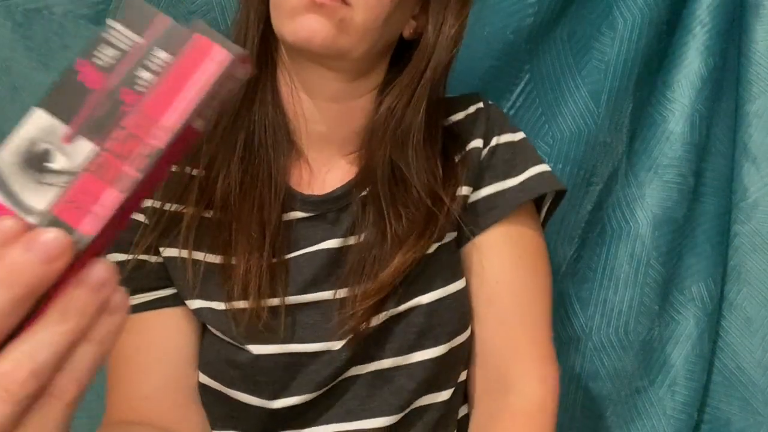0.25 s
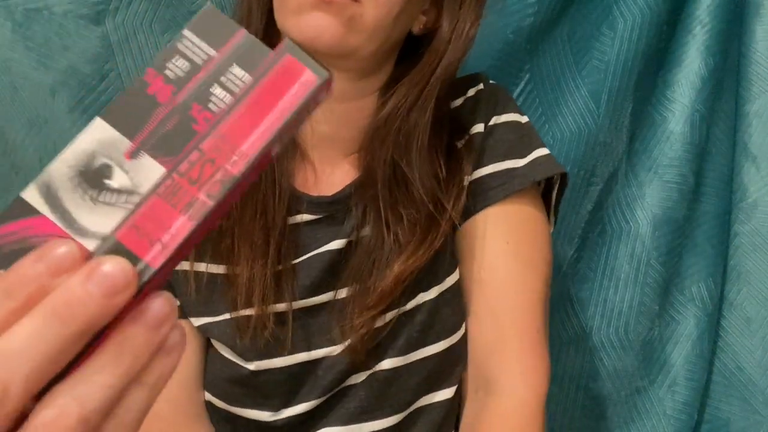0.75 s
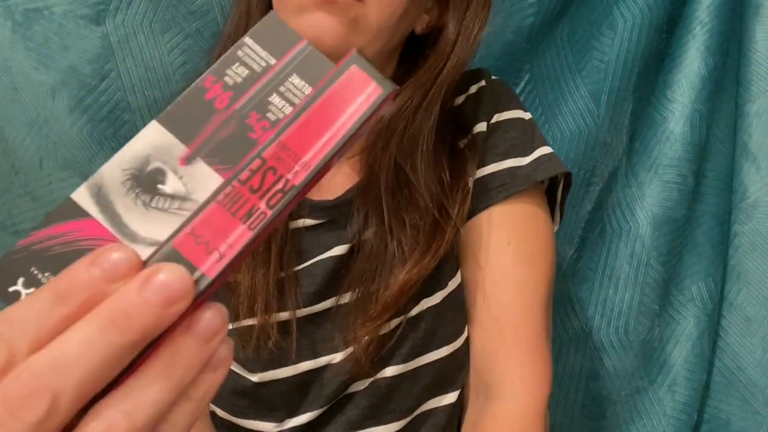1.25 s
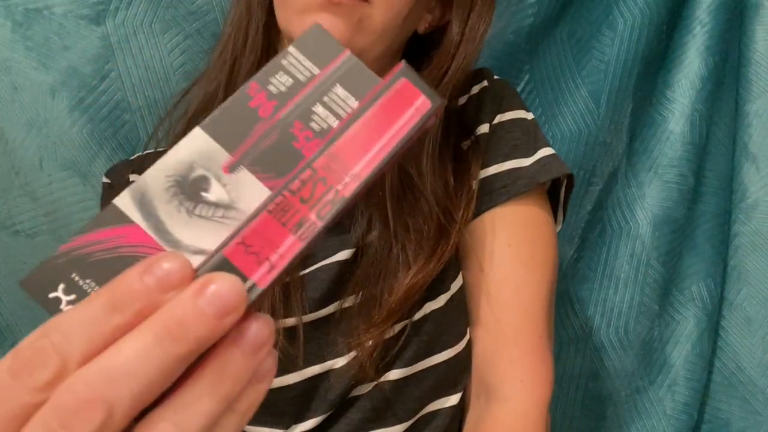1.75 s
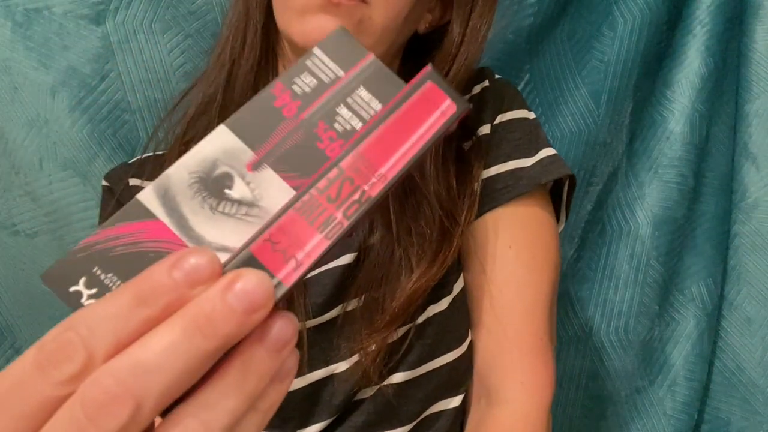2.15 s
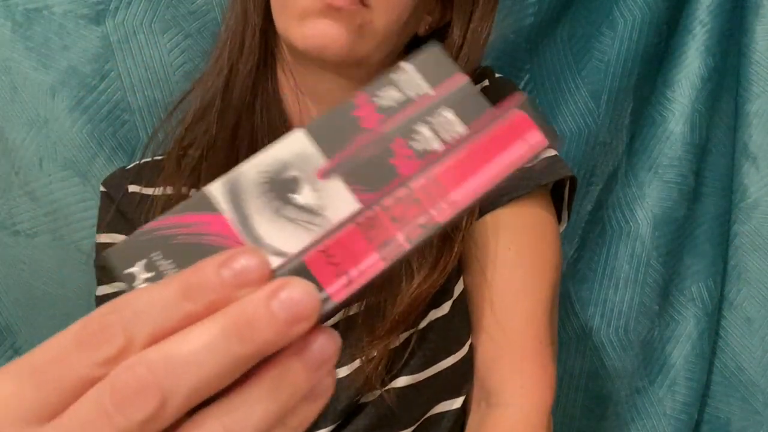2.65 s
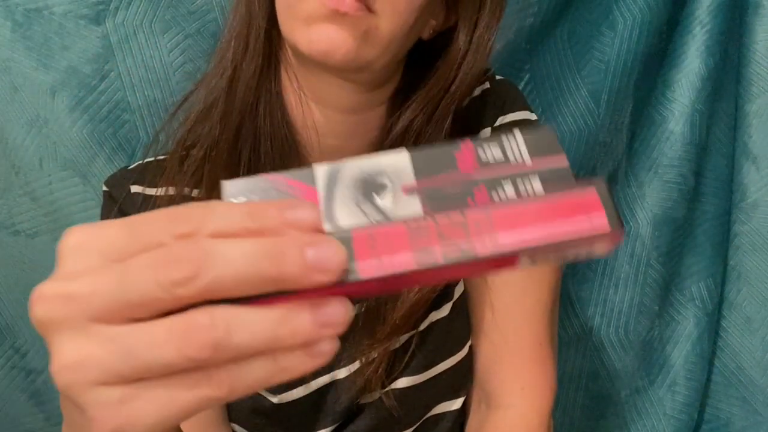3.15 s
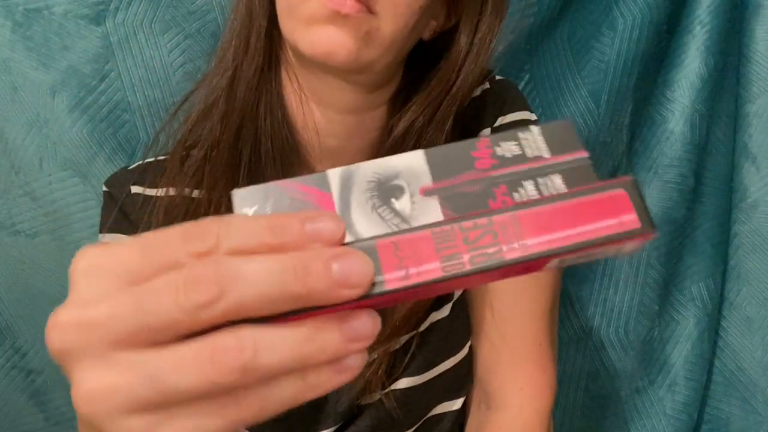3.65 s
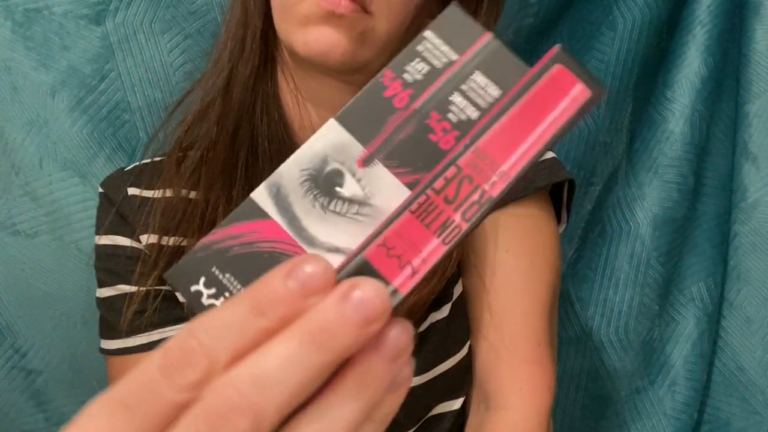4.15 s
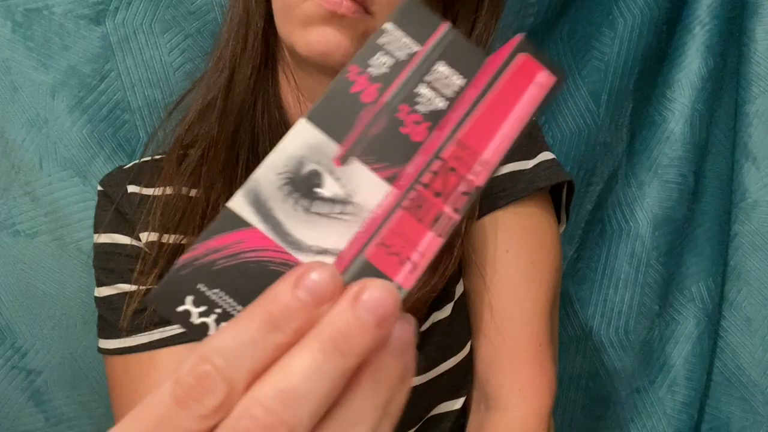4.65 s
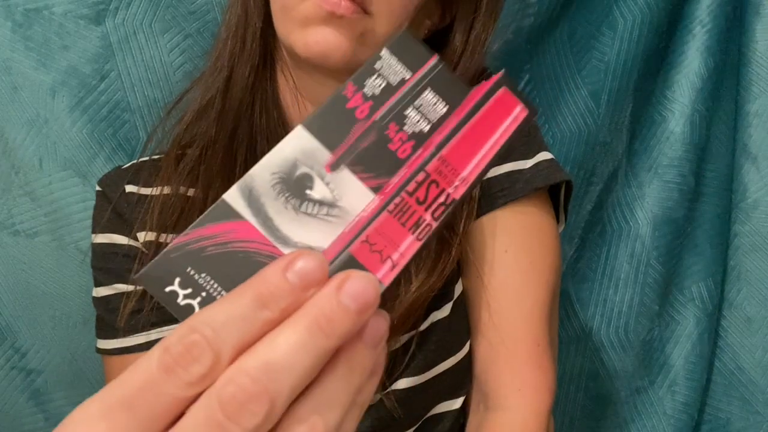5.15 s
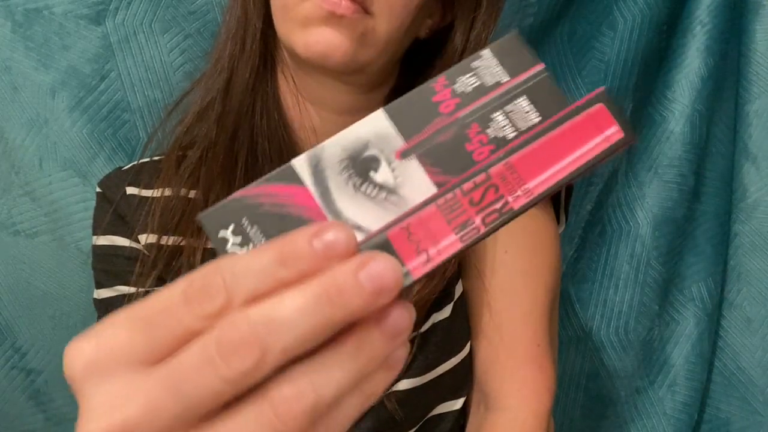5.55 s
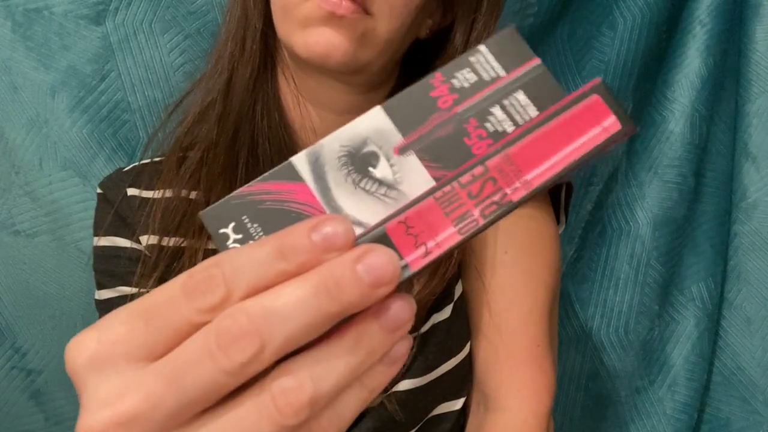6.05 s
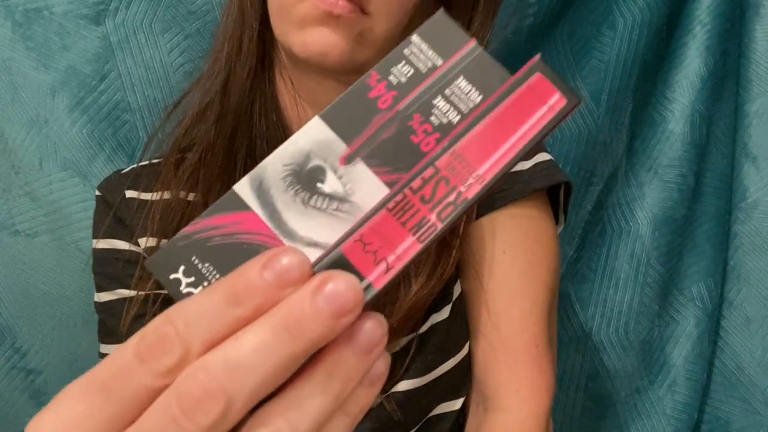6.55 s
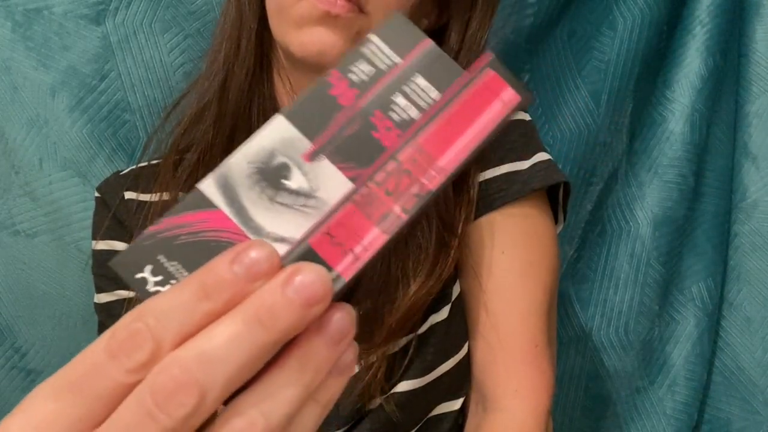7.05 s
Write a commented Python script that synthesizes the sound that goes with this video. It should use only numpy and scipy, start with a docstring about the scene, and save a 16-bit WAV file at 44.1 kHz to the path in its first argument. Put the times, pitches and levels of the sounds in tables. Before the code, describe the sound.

Rapid hollow taps and light clicks on a small carton, with faint scuffs between, very close, over soft steady hiss.

```python
"""Knocks on a slim cardboard box

A hand holds the box with a plastic tube close to a small stereo microphone in a quiet, curtained room.
Quick hard knocks, strong and weak mixed, are damped box modes plus a noise crack and a low thud of air.
Brief scuffs and light rubbing are uneven coloured noise; the box drifts to the right overall.
Sparse, fast-dying echoes and a steady hiss lie behind."""
import sys
import numpy as np
from scipy import signal
from scipy.fft import rfft, irfft
from scipy.io import wavfile
from scipy.ndimage import uniform_filter1d

SR = 44100
rng = np.random.default_rng(int(sys.argv[2]) if len(sys.argv) > 2 else 0)


def dump(signal):
    """Clip the signal to [-1, 1] and save it as 16-bit WAV at the path in sys.argv[1]."""
    limited = np.clip(np.atleast_2d(signal).T, -1, 1)
    pcm = np.round(limited * 32767).astype(np.int16)
    wavfile.write(sys.argv[1], SR, pcm)


N = 321489

# Source levels are port-mean peaks (rubbing: right-port RMS), ahead of echoes and microphone colour.
# Hiss of room and microphone, spectrum: f/Hz, relative level/dB
HISS_SPECTRUM = [(25, -15), (45, -2), (75, -7.5), (120, -1), (200, -12), (450, -26), (1500, -22),
                 (4000, -26.5), (8000, -30), (10500, -38), (12500, -33), (14800, -46.5)]
# Hiss, left-right likeness: f/Hz, correlation/1
HISS_LIKENESS = [(60, 0.27), (200, 0.29), (630, 0.27), (3000, -0.36), (8000, -0.0015), (12500, 0.38)]
# Echo decay: f/Hz, t60/s
ROOM_T60 = [(100, 0.62), (400, 0.22), (1500, 0.21), (5000, 0.18), (12000, 0.17)]
# Echo colour: f/Hz, gain/dB
ECHO_COLOUR = [(150, -0.5), (400, -2.5), (1000, -4), (3000, 1.8), (8000, 2)]
# Microphone response: f/Hz, gain/dB
MICROPHONE_RESPONSE = [(30, -17), (70, 5.5), (110, 0.5), (170, -3), (260, -0.16), (8500, 0.1), (9600, 1.5),
                       (10500, -15.5), (11600, -6.5), (13200, -6.5), (15000, -10.5)]
# Left-port shading against right: f/Hz, gain per pan/(dB/dB)
PORT_SHADE = [(100, 1.8), (480, 0.69), (720, 1.82), (1000, 0.9), (1300, .5), (2500, 0.48), (3400, 0.33)]
# Left-port phase against right, low band: f/Hz, phase per pan/(rad/dB)
PORT_PHASE = [(100, 0.013), (430, 0.012), (700, 0.048), (950, 0.088), (1500, 0.16), (2500, 0.24),
              (3400, 0.39)]
# Left-port phase lead, treble: f/Hz, phase/rad
TREBLE_LEAD = [(4000, -.5), (4800, -1.3), (5500, -2.2), (7000, -.8), (8000, .05), (10400, 3.1),
               (12000, 6.0), (13600, 6.6), (14700, 9.3)]
# Box position: t/s, left minus right/dB
BOX_SIDE = [(0.0, 5), (.55, 2.5), (.75, -4), (1.4, -6), (2.3, -8.5), (3.0, -11.5), (4.5, -12), (5.5, -14),
            (6.0, -14), (6.3, -9), (7.29, -12)]
# Rubbing of skin and plastic on card: t/s, level/dB
RUBBING_LEVEL = [(0.0, -64), (0.67, -79.5), (0.91, -68), (1.2, -80.5), (2.17, -68.5), (2.39, -81.5),
                 (3.84, -89), (4.04, -79), (4.97, -82.5), (5.16, -70), (5.64, -74), (6.19, -80),
                 (7.29, -86.5)]
# Rubbed card, spectrum: f/Hz, relative level/dB
GRIT_SPECTRUM = [(200, -2), (600, 0.5), (2000, 1.3), (4000, -9), (8000, -17.5), (15000, -21)]
# Scuffs: t/s, peak level/dB, 1/e fall of the envelope/ms
SCUFF_EVENTS = [(0.019, -50, 3.3), (0.059, -53, 12), (0.14, -63.5, 2.5), (0.233, -48.5, 51),
                (.299, -46, 6.9), (0.367, -48.5, 36), (.618, -67, 53), (0.749, -53, 24), (.766, -48, 6),
                (0.828, -43.5, 9.9), (0.891, -43, 14), (0.94, -49, 23), (1.021, -39.5, 5.5),
                (1.066, -47.5, 16), (1.085, -48.5, 7.), (1.16, -65, 9.5), (1.186, -58.5, 18),
                (1.278, -63.5, 8.), (1.301, -60.5, 13), (1.45, -48.5, 2.7), (1.545, -57.5, 25),
                (1.711, -52, 4.8), (1.956, -51, 6.6), (2.036, -48, 3.4), (2.086, -46, 4),
                (2.163, -50.5, 6.), (2.226, -51, 6.9), (2.346, -54.5, 7.8), (2.481, -49.5, 3.6),
                (2.847, -46, 4.4), (3.539, -60, 5.1), (3.812, -50.5, 10), (3.907, -38, 2.8),
                (4.212, -60, 6.7), (4.297, -63, 6.6), (4.347, -59.5, 8.4), (4.607, -45.5, 5.6),
                (4.672, -56.5, 24), (4.737, -62, 25), (5.224, -61.5, 6.1), (5.397, -46, 14),
                (5.513, -55, 7.6), (5.974, -58, 19)]
# Knocks: t/s, box peak level/dB, lowest mode f/Hz, crispness/dB, thud peak level/dB
KNOCK_EVENTS = [(0.076, -31, 405, -3.5, -56.5), (0.186, -30.5, 408, -2, -74), (0.259, -28.5, 398, 0.5, -65),
                (0.312, -19.5, 448, 0.5, -54), (0.386, -49, 404, 21, -61), (0.45, -54.5, 369, 15.5, -82),
                (0.552, -44, 396, -11, -64), (0.646, -54.5, 387, 5.5, -61), (0.694, -31.5, 376, -7, -65),
                (0.777, -33, 484, -3.5, -59.5), (0.838, -25.5, 432, -4, -68), (0.903, -30, 366, -5, -63),
                (0.962, -21, 446, -6, -50), (1.034, -29.5, 350, -3.5, -56.5), (1.095, -26, 438, -11, -52.5),
                (1.214, -46, 390, -5.5, -53), (1.329, -30.5, 337, -6.5, -73), (1.392, -42.5, 360, 9, -76),
                (1.454, -35, 355, -8.5, -65), (1.517, -51, 533, 3, -67), (1.571, -30.5, 377, -8.5, -72),
                (1.643, -47, 464, 8, -62), (1.7, -46.5, 520, 9, -58.5), (1.776, -54, 316, 44, -89.5),
                (1.831, -33.5, 385, -0.5, -73), (1.897, -42.5, 377, 28, -76),
                (1.963, -30, 444, -1.5, -50.5), (2.028, -44.5, 467, 19, -67), (2.096, -26.5, 440, -3, -51),
                (2.166, -47.5, 372, 19, -78), (2.236, -27, 463, -1.5, -62.5), (2.356, -35.5, 486, -1, -63),
                (2.486, -40, 439, -1.5, -65.5), (2.594, -39, 440, 1.5, -59.5), (2.671, -51.5, 364, 25, -69),
                (2.738, -29, 396, 6, -66), (2.837, -33, 431, 5, -61), (2.932, -45.5, 420, -0.5, -64),
                (3.04, -59.5, 418, 1.5, -69.5), (3.175, -32, 459, 4.5, -61.5), (3.291, -40, 458, 2.5, -69),
                (3.431, -31, 437, 7.5, -90), (3.548, -34.5, 496, -7, -63), (3.655, -66, 404, -4.5, -79),
                (3.824, -25.5, 444, 1.5, -61), (3.914, -28, 330, -4.5, -65.5), (3.941, -30.5, 330, 12, -64),
                (4.092, -29.5, 439, -1, -64.5), (4.17, -46.5, 390, 8, -66), (4.221, -28.5, 392, 0.5, -75),
                (4.356, -46, 377, 0.5, -61), (4.421, -52.5, 533, 14, -68), (4.483, -55, 394, 16, -65),
                (4.553, -56, 530, 21.5, -67.5), (4.599, -34.5, 383, -0.5, -64.5),
                (4.665, -48.5, 401, 18.5, -65.5), (4.811, -48, 530, 28, -68.5), (4.958, -53, 526, 27, -92),
                (5.014, -21, 425, 5, -51.5), (5.077, -41.5, 453, 7.5, -61),
                (5.153, -25.5, 438, -1.5, -57.5), (5.267, -30, 375, -1.5, -50),
                (5.331, -44, 430, 14, -63.5), (5.4, -24.5, 408, 2, -65), (5.447, -42.5, 513, 12.5, -64.5),
                (5.47, -30, 395, -2.5, -64.5), (5.523, -19, 403, 2, -50), (5.58, -47.5, 447, 15.5, -86),
                (5.638, -27.5, 380, 0, -84), (5.695, -45.5, 417, 11.5, -68), (5.751, -28, 424, 0, -87),
                (5.813, -42, 513, 8, -61), (5.867, -25, 437, -2, -66.5), (5.937, -46.5, 350, 3, -53),
                (5.988, -24.5, 441, 0, -55), (6.069, -50.5, 380, -5, -60.5), (6.113, -33, 398, 0, -52),
                (6.21, -44, 330, -7, -58), (6.288, -46.5, 440, 12, -53.5), (6.355, -35.5, 426, -6.5, -53),
                (6.475, -44, 382, -0.5, -63), (6.534, -54, 490, 18, -66), (6.582, -34.5, 418, 0, -66),
                (6.657, -51.5, 390, 17, -66), (6.732, -30.5, 447, 5, -85), (6.819, -50, 400, 11, -71),
                (6.884, -37.5, 443, 3, -74), (7.008, -46.5, 369, 8.5, -65), (7.131, -43.5, 387, 5.5, -68),
                (7.254, -37, 436, -1.5, -71)]
# Upper box modes: mean f/Hz, mean level/dB, nominal decay/s
BOX_MODES = [(571.6, -16.5, 0.036), (710, -7, .013), (907.4, -9, 0.014), (1123, -11.5, 0.013),
             (1691, -13.5, 0.018), (2052, -18, 0.023), (2221, -18, 0.016), (2848, -17, 0.014),
             (3338, -22, 0.0097), (3730, -32, 0.0025), (4440, -22, 0.0088), (4900, -27, .006),
             (5695, -24.5, 0.0089), (6670, -41.5, 0.0035), (8130, -21, .006)]
# Bass radiation of the small box: f/Hz, gain/dB
BOX_RADIATION = [(60, -19), (150, -11), (200, -0.1), (400, 0.2)]
# Hard knock on card, spectrum: f/Hz, relative level/dB
CRACK_SPECTRUM = [(300, -21.5), (1000, -6.5), (2800, -1.3), (5000, -13), (8200, -14.5), (15000, -21)]
# Lift of the upper modes: f/Hz, base gain/dB, gain per crispness/(dB/dB); GRIP adds to the last row
CRISP_LIFT = [(900, 1, 0.39), (2700, 0.03, 0.98), (8000, -10, 0.86)]
# Grip drift as the hand shifts: t/s, base t60 of lowest mode/s, extra treble firm/dB, light/dB
GRIP_DRIFT = [(0.1, 0.013, 5, 4), (.45, .012, 7.5, 3), (.6, 0.011, 5, -10), (1.0, 0.0097, 1, -12),
              (1.45, .012, -2, -10), (1.65, 0.011, 6.5, 1), (1.9, 0.014, 5, 7.5), (2.3, 0.011, -5, -6),
              (2.7, .016, 0, -6), (3.4, 0.016, 0.5, -6), (3.9, .013, 4, -5), (4.2, 0.012, -5.5, -8),
              (4.35, 0.015, -4, -29), (4.56, .013, 6, -21), (4.7, .013, 3, 4), (5.0, 0.013, 1, 8.5),
              (5.3, 0.011, -2, -1), (5.5, .013, 6.5, 6), (5.7, .013, -3, 0.5), (6.0, 0.011, -3, -12),
              (6.5, 0.01, 3.5, -4), (6.66, .016, 0, -24), (6.8, 0.012, -4.5, -8), (7.2, 0.021, 2, -1.5)]
# Thud, settled pitch: t/s, f/Hz
THUD_PITCH = [(0.0, 62), (.7, 79.9), (3.8, 80), (4.7, 60), (5.6, 60), (6.3, 68), (7.29, 70)]

HISS_RMS_DB, ECHO_DB, TURN_HZ = -79.5, -16, 1.7
BAND_EDGE_HZ = 15200
EVENT_SAMPLES, LEAD_IN_SAMPLES = 8192, 800
SCUFF_RISE_SHARE = 0.17  # rise time constant over fall time constant
LIGHT_DB, LIGHT_SPREAD_DB, LIGHT_SIDE_DB = -41, 2.5, -9  # light taps blend to one steady side
MODE_SCATTER_DB, MODE_SCATTER_SHARE, START_SCATTER_CYCLES = 1.4, 0.052, 0.14
RING_S_PER_CRISP_DB = .00015  # a crisp blow is damped less
CONTACT_DELAY_S, AIR_DELAY_S = .0012, .0025  # contact after event time, main thud after contact
THUD_FALL_SHARE, THUD_FALL_S = 0.68, .018  # starts this share higher, then sinks


def gain_of(db):
    """Amplitude ratio of a level in dB."""
    return 10 ** (np.asarray(db) / 20)


def evened(x):
    """Scale to unit RMS."""
    return x / np.sqrt(np.mean(x ** 2) + 1e-20)


def read(points, hz):
    """Interpolate a table over log frequency."""
    f, value = np.transpose(points)
    return np.interp(np.log(hz + 1), np.log(f + 1), value)


def at_time(points, s):
    """Interpolate a two-column table over time."""
    return np.interp(s, *np.transpose(points))


def add(mix, s, sound):
    """Mix a stereo event in at time s, cut at the end."""
    part = mix[:, round(s * SR):][:, :sound.shape[1]]
    part += sound[:, :part.shape[1]]


def coloured(x, points):
    """Zero-phase filter with tabled gains in dB."""
    hz = np.fft.rfftfreq(x.shape[-1], 1 / SR)
    return irfft(rfft(x) * gain_of(read(points, hz)), x.shape[-1])


def peaked(pair, db):
    """Set the peak of the port mean."""
    return gain_of(db) * pair / abs(pair.mean(0)).max()


def ports(x, pan_db):
    """Stereo pickup: lows reach the far port weaker and later, treble phase is fixed, bass lags in both."""
    hz = np.fft.rfftfreq(x.shape[-1], 1 / SR) + 1
    low_share = 1 / (1 + (hz / 3600) ** 8)
    low = gain_of(pan_db * read(PORT_SHADE, hz)) * np.exp(1j * pan_db * read(PORT_PHASE, hz))
    treble = np.exp(1j * read(TREBLE_LEAD, hz))
    turns = .4 * np.log(np.maximum(hz, 40) / 8000)  # group delay of 0.4 cycle above 40 Hz
    right = rfft(x) * np.exp(-2j * np.pi * turns)
    left = right * (low_share * low + (1 - low_share) * treble)
    return irfft(np.array([left, right]), x.shape[-1])


def hiss():
    """Steady coloured noise, partly correlated between ports by frequency."""
    a, b = rfft(rng.standard_normal((2, N)))
    same = np.clip(read(HISS_LIKENESS, np.fft.rfftfreq(N, 1 / SR)), -1, 1)
    left = same * a + np.sqrt(1 - same ** 2) * b
    pair = irfft(np.array([left, a]), N)
    return gain_of(HISS_RMS_DB) * evened(coloured(pair, HISS_SPECTRUM))


def room(x):
    """Sparse echoes of random sign, each band dying at its own rate."""
    taps = np.zeros((2, SR // 2))
    at = np.arange(300, SR // 2 - 20, 20)
    at = at + rng.integers(0, 20, (2, len(at)))
    np.put_along_axis(taps, at, rng.choice([-1., 1.], at.shape), 1)
    hz, t, z = signal.stft(taps + 0.18 * taps[::-1], SR, nperseg=256)
    decay = gain_of(-60 * t / read(ROOM_T60, hz)[:, None])
    tail = signal.istft(z * decay, SR, nperseg=256)[1]
    heard = 0.5 * x + 0.47 * x[1]  # echoes come from all sides: the far port loses less
    tail = tail / np.linalg.norm(tail[0])
    return signal.fftconvolve(coloured(heard, ECHO_COLOUR), tail, axes=1)[:, :N]


def rubbing():
    """Skin and plastic shift on card: coloured noise in uneven little bursts."""
    slow = uniform_filter1d(uniform_filter1d(rng.standard_normal(N), 500), 500)
    bursts_db = 4 * evened(slow)
    grit = evened(coloured(rng.standard_normal(N) * gain_of(bursts_db), GRIT_SPECTRUM))
    level_db = at_time(RUBBING_LEVEL, np.arange(N) / SR)
    return ports(grit * gain_of(level_db), -7.5)


def scuff(s, db, fall_ms):
    """Gritty slide: roughened noise that swells quickly and trails off."""
    t = (np.arange(EVENT_SAMPLES) - LEAD_IN_SAMPLES) / SR
    noise = rng.standard_normal(EVENT_SAMPLES)
    roughness_db = 3.5 * evened(uniform_filter1d(rng.standard_normal(EVENT_SAMPLES), 40))
    grit = noise * gain_of(roughness_db)
    shape = np.exp(-(t * 1000 / fall_ms / np.where(t < 0, SCUFF_RISE_SHARE, 1)) ** 2)
    return peaked(ports(coloured(grit * shape, GRIT_SPECTRUM), 0.2 * at_time(BOX_SIDE, s)), db)


def ring(t, hz, decay_s, start_cycles, swell=1):
    """Mode that swells through the short contact and dies quickly."""
    u = t * 2.58 * np.log(1000) / decay_s
    return (u * np.exp(1 - u)) ** swell * np.sin(2 * np.pi * (hz * t + start_cycles))


def upper_modes(t, chance):
    """Each blow lands elsewhere, so modes shift in level, pitch and phase."""
    total = np.zeros(EVENT_SAMPLES)
    for (hz, db, decay_s), (louder, higher, start) in zip(BOX_MODES, chance):
        gain = gain_of(db + MODE_SCATTER_DB * louder)
        mode_hz = hz * (1 + MODE_SCATTER_SHARE * higher)
        total = total + gain * ring(t, mode_hz, decay_s, START_SCATTER_CYCLES * start, swell=0.58)
    return total


def crack(signed, t):
    """Hard knock on card: noise with a short graze, a snap, then a quick tail."""
    snap_and_tail = gain_of(-60 * t / 0.0064) + gain_of(-10.0 - 60 * t / 0.049)
    graze = gain_of(-15.5 + 60 * signed / 0.024)
    noise = coloured(rng.standard_normal(EVENT_SAMPLES), CRACK_SPECTRUM)
    sound = noise * np.where(signed < 0, graze, snap_and_tail)
    return sound / abs(sound).max()


def thud(s, signed, t):
    """Pushed air: a sinking low tone, a 47 Hz tone and a short 210 Hz tone."""
    late = np.maximum(signed - AIR_DELAY_S, 0)
    hz = at_time(THUD_PITCH, s)
    sinking_cycles = hz * THUD_FALL_SHARE * THUD_FALL_S * (1 - np.exp(-late / THUD_FALL_S))
    main = ring(late, hz, 0.097, sinking_cycles)
    deep = gain_of(-6.5) * ring(late, 47, 0.14, .02)
    return main + deep + gain_of(-3.5) * ring(t, 210, 0.028, 0.025)


def knock(s, db, hz, crisp_db, thud_db, chance):
    """Blow on the box: damped lowest mode, upper modes and crack, with a light first touch and a thud."""
    signed = (np.arange(EVENT_SAMPLES) - LEAD_IN_SAMPLES) / SR - CONTACT_DELAY_S
    t = np.maximum(signed, 0)
    light = 1 / (1 + np.exp((db - LIGHT_DB) / LIGHT_SPREAD_DB))
    times, *grip = np.transpose(GRIP_DRIFT)
    ring_s, firm_db, light_db = (np.interp(s, times, column) for column in grip)
    t60_s = ring_s + RING_S_PER_CRISP_DB * crisp_db
    pan_db = light * LIGHT_SIDE_DB + (1 - light) * at_time(BOX_SIDE, s)

    colour = [(hz, 0)] + [(f, base_db + slope * crisp_db) for f, base_db, slope in CRISP_LIFT]
    top_hz, top_db = colour[-1]
    colour[-1] = top_hz, top_db + light * light_db + (1 - light) * firm_db
    upper = coloured(upper_modes(t, chance) + gain_of(-7) * crack(signed, t), colour)

    # the grip damps the lowest mode ever faster
    held = (1 - np.exp(-t / 0.0014)) * np.exp(-np.log(1000) * (t / t60_s) ** 2)
    box = coloured(held * np.sin(2 * np.pi * hz * t) + upper, BOX_RADIATION)
    touch_lead_s = 0.0046 + .0012 * chance[0, 2]
    touch_db = -20.5 + 3 * chance[1, 2]
    box = box + gain_of(touch_db) * np.roll(box, -round(touch_lead_s * SR))

    air = ports(thud(s, signed, t), 0.36 * pan_db)
    return peaked(ports(box, pan_db), db) + peaked(air, thud_db)


def scene():
    """Rubbing, knocks and scuffs, their echoes, microphone colour, then hiss."""
    box = rubbing()
    chance = rng.standard_normal((len(KNOCK_EVENTS), len(BOX_MODES), 3))
    lead_in_s = LEAD_IN_SAMPLES / SR
    for row, luck in zip(KNOCK_EVENTS, chance):
        add(box, row[0] - lead_in_s, knock(*row, chance=luck))
    for row in SCUFF_EVENTS:
        add(box, row[0] - lead_in_s, scuff(*row))
    # the box keeps moving: two echo patterns trade weight
    turn = np.arange(N) / SR * 2 * np.pi * TURN_HZ
    echoes = room(box * np.cos(turn)) + room(box * np.cos(turn + np.pi / 2))
    return coloured(box + gain_of(ECHO_DB) * echoes, MICROPHONE_RESPONSE) + hiss()


def record(dry):
    """Linear-phase low-pass: the band limit."""
    taps = signal.firwin(511, BAND_EDGE_HZ, window=("kaiser", 9), fs=SR)
    return signal.oaconvolve(dry, taps[None], "same")


dry = scene()
out = record(dry)
dump(out)
```